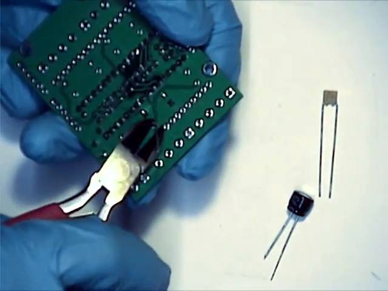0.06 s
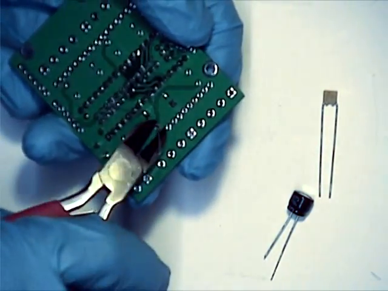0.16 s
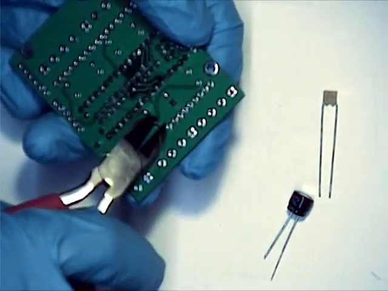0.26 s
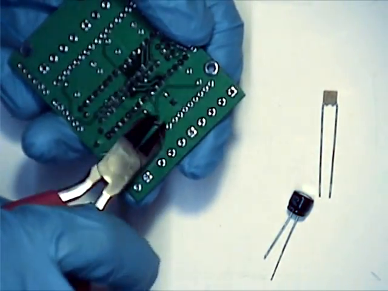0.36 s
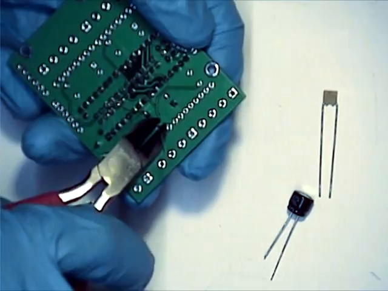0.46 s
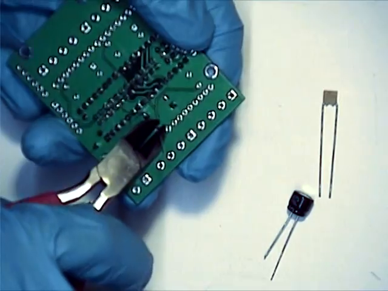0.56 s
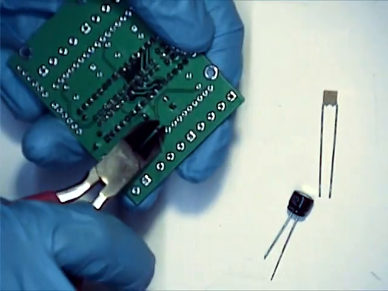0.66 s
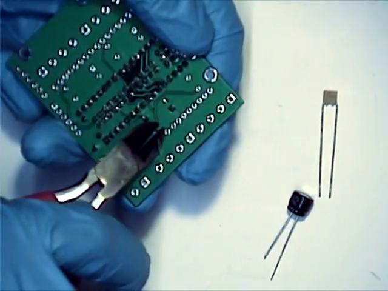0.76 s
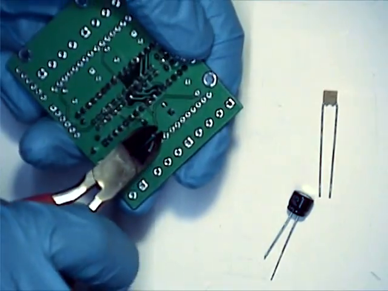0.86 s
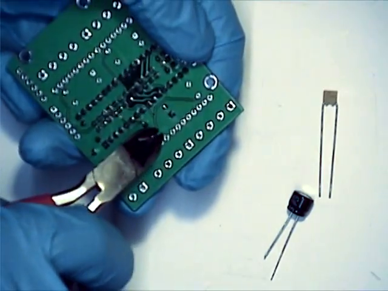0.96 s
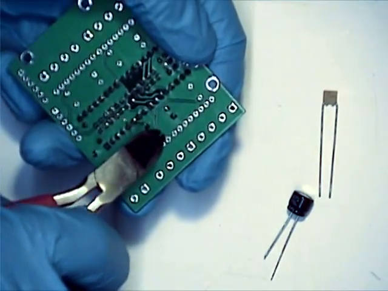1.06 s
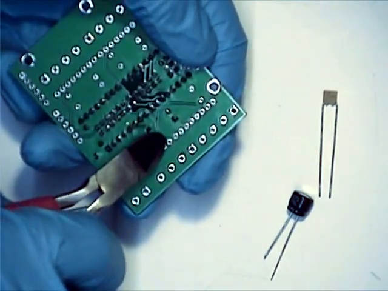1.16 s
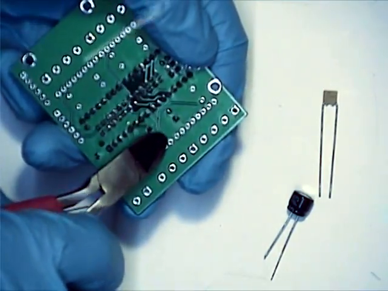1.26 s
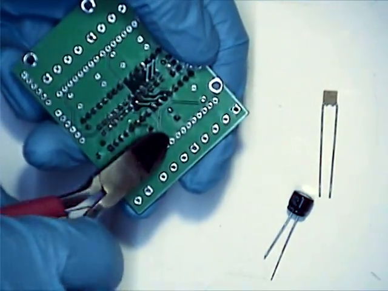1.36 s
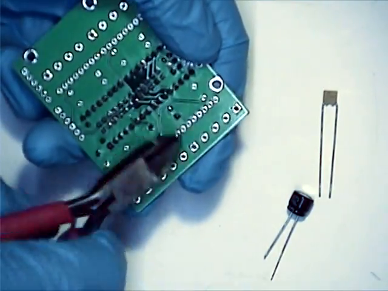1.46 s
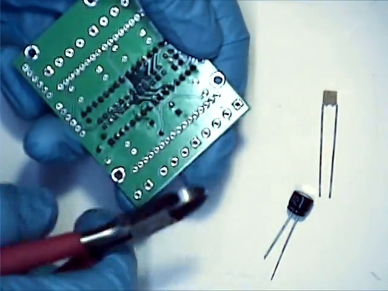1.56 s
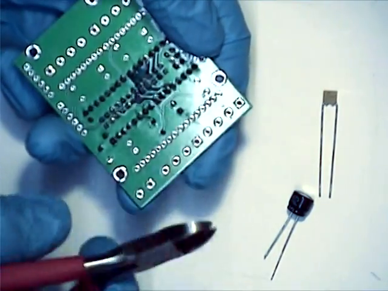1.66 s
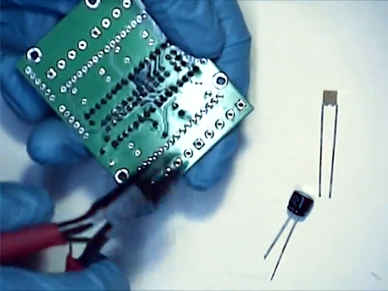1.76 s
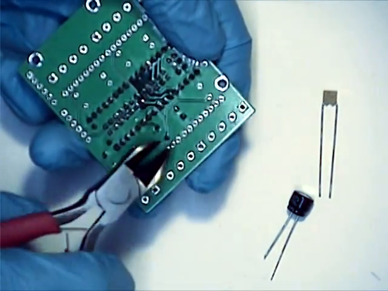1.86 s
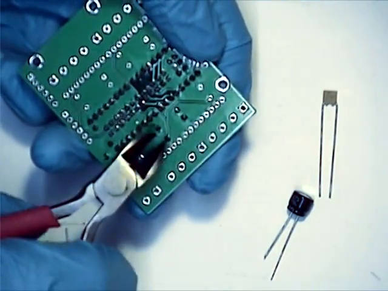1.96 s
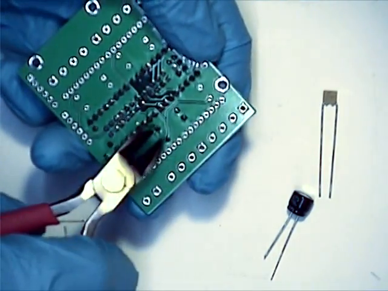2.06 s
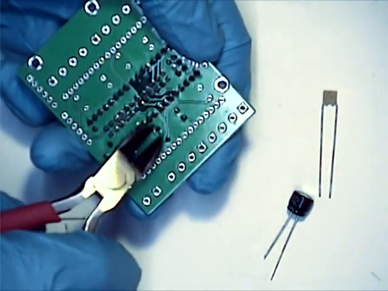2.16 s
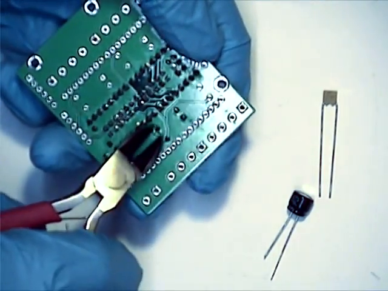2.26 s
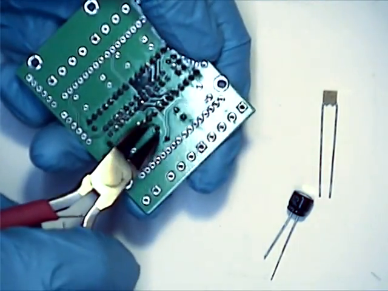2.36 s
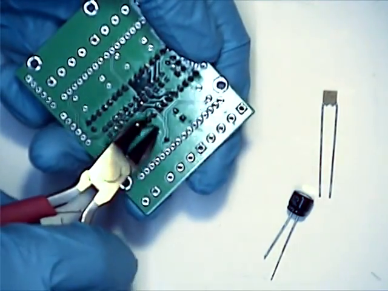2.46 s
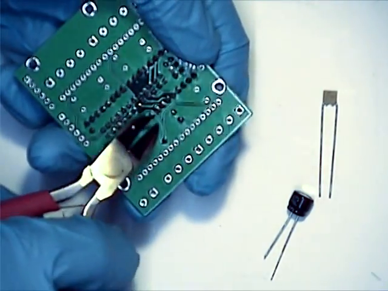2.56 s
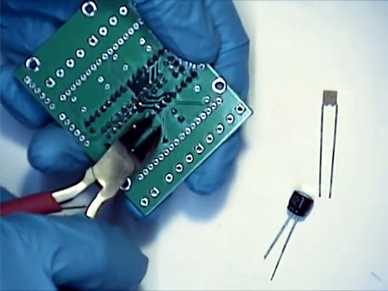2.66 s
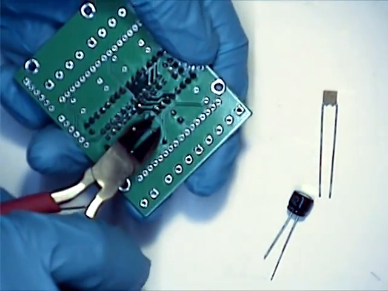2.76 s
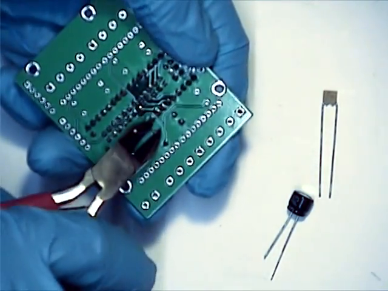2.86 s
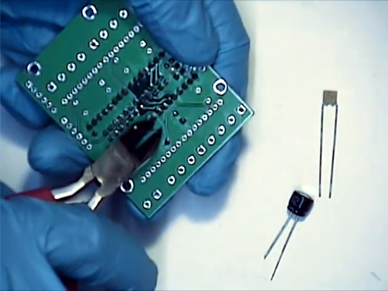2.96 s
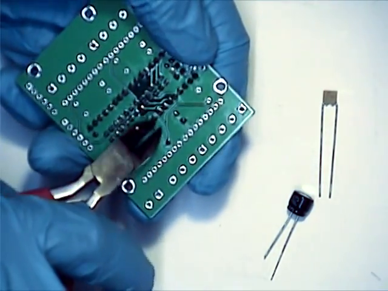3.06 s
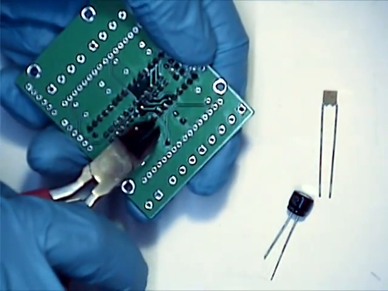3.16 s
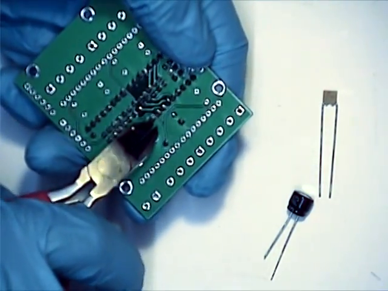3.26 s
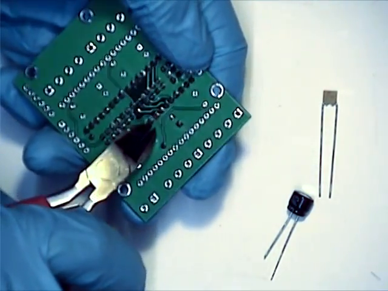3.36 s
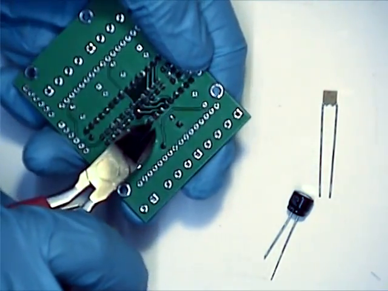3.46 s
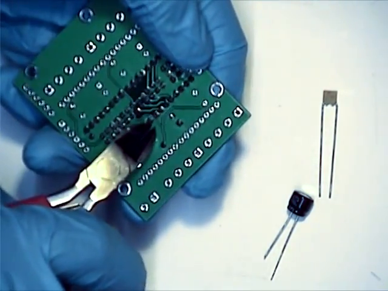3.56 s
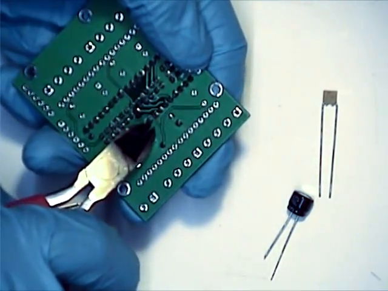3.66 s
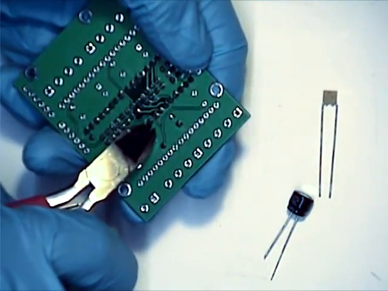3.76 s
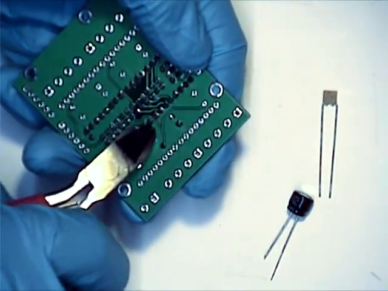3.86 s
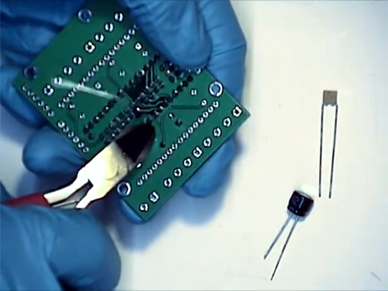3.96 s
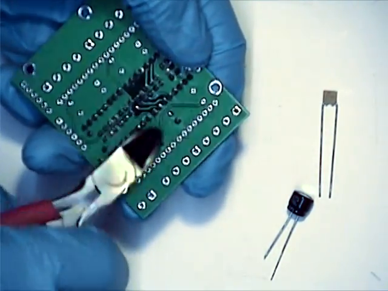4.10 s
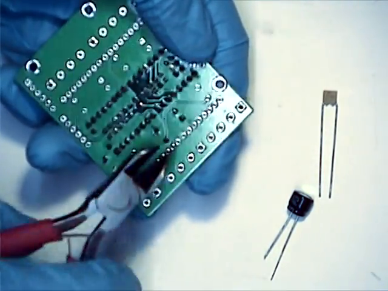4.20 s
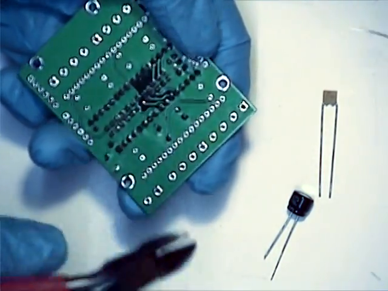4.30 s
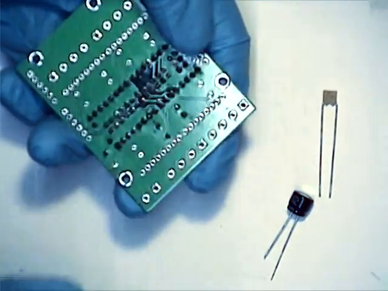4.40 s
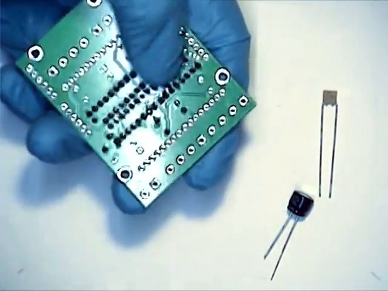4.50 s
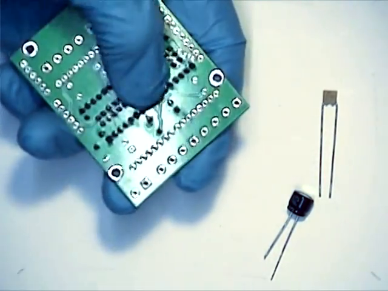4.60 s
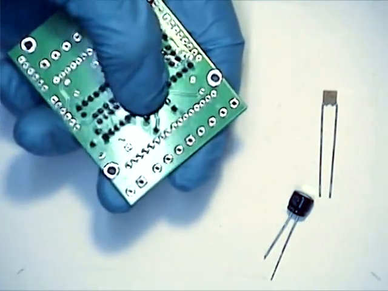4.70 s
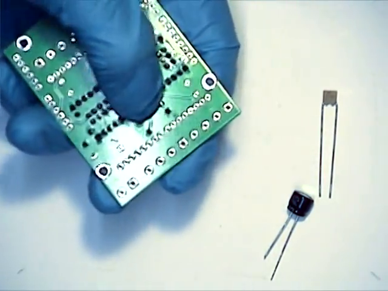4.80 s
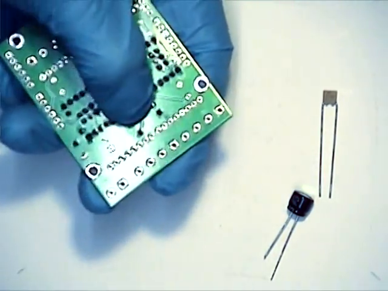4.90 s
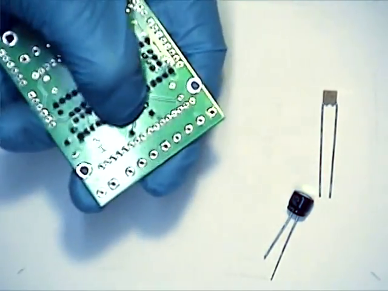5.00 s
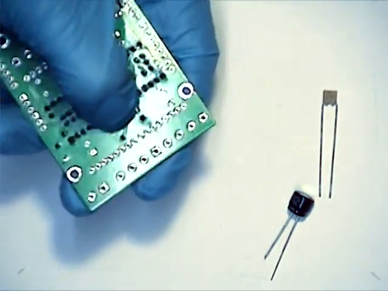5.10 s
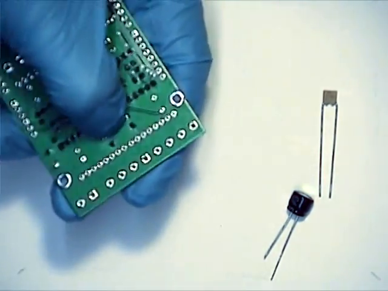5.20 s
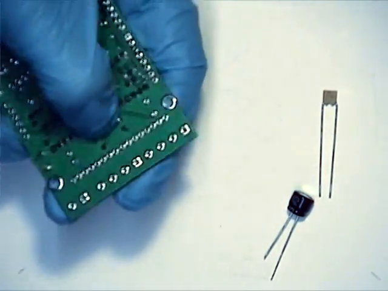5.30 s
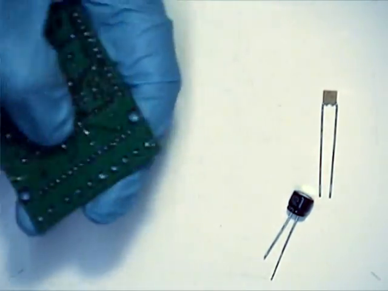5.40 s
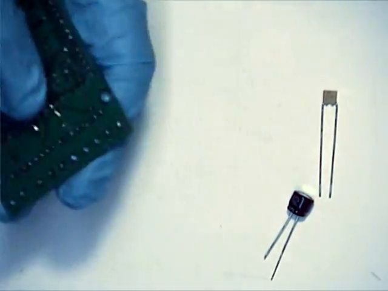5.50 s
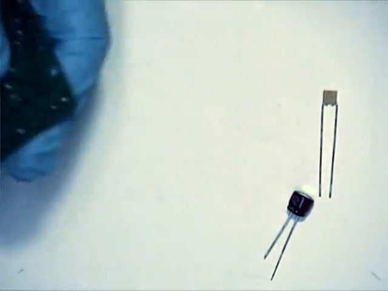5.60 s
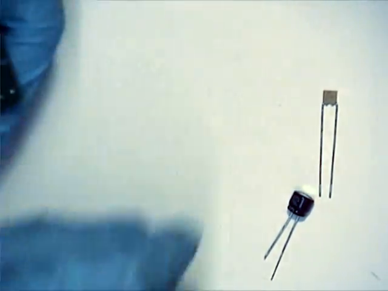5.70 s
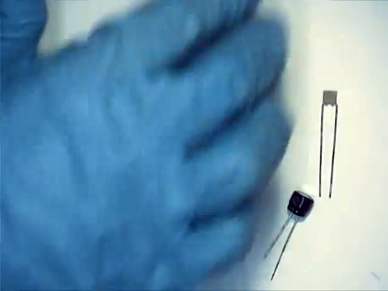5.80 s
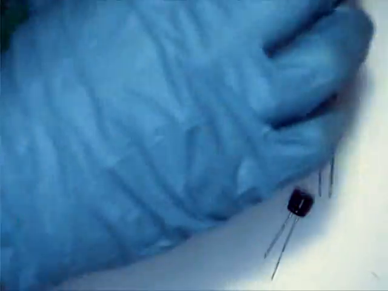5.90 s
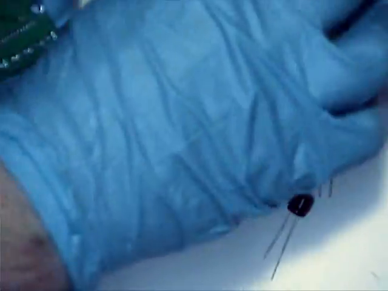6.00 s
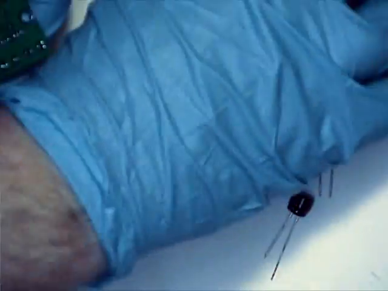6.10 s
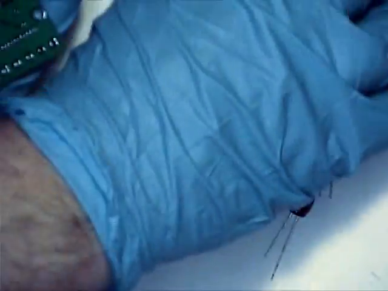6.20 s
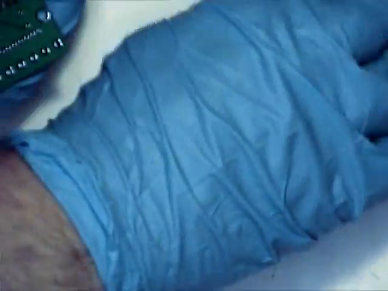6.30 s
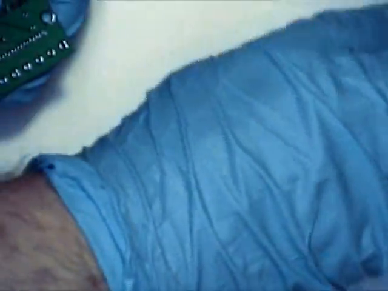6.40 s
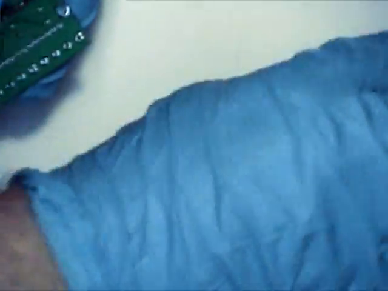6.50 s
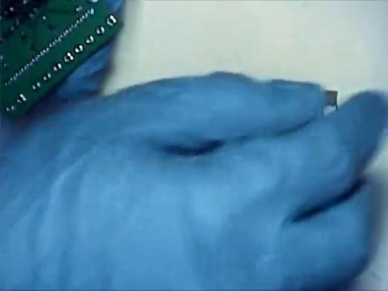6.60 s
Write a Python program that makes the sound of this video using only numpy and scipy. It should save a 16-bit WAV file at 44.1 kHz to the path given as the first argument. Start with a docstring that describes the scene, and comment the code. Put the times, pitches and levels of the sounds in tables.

```python
"""Close at a workbench, a microphone pair hears a continuous background: summed tones of a mains buzz
and a thin whine, and steady noise as hiss.
Side cutters crack through a wire, clack and rebound; then gloves, rubbed as tiny slips, shift the ticking board.
The hands move, the buzz changes colour, and a second, louder snip is followed by more clacks.
The board scrapes, ticks and bumps the ringing bench; last, a glove sweeps past the microphones.
A small, dry room answers the handwork with decaying noise echoes."""
import sys
import numpy as np
from scipy import signal
from scipy.fft import rfft, irfft
from scipy.io import wavfile

SR = 44100
rng = np.random.default_rng(int(sys.argv[2]) if len(sys.argv) > 2 else 0)


def persist_wave(psi):
    """Save psi, clipped to +-1, as 16-bit WAV."""
    counts = np.round(np.clip(psi, -1, 1) * 32767).astype(np.int16)
    wavfile.write(sys.argv[1], SR, np.atleast_2d(counts).T)


N = 293258
TIME = np.arange(N) / SR


def amp(db):
    """Decibels to gain."""
    return 10 ** (np.asarray(db) / 20)


def evened(x):
    """Scales to an rms of one."""
    return x / np.sqrt(np.mean(x ** 2) + 1e-20)


def read(points, hz, axis=1):
    """Joins one column of the points by straight lines on a log-frequency axis."""
    columns = np.transpose(points)
    return np.interp(np.log(hz + 1), np.log(columns[0] + 1), columns[axis])


def octaves(hz):
    """Octaves above 5 kHz, the hinge of every tilt; held constant below 400 Hz."""
    return np.log2(np.maximum(hz, 400) / 5000)


def add(mix, s, sound):
    """Mixes a sound in at a time in seconds."""
    part = mix[round(s * SR):][:len(sound)]
    part += sound[:len(part)]


def ring(modes):
    """Damped tones struck together, each losing 60 dB in its t60."""
    t = TIME[:SR // 3]
    return sum(amp(db - 60 * t / t60) * np.cos(2 * np.pi * hz * t) for hz, db, t60 in modes)


def crack(colour, tilt_db=0, ring_hz=1, ring_db=0, ring_octaves=0.12, spread=0.000908, size=4096):
    """A causal click of unit energy; bending waves carry its treble ahead of its bass."""
    hz = np.fft.rfftfreq(size, 1 / SR)
    bump = np.exp(-(np.log2((hz + 1) / ring_hz) / ring_octaves) ** 2)
    gain = amp(read(colour, hz) + tilt_db * octaves(hz) + ring_db * bump)
    # the minimum phase that belongs to this gain
    log_gain = np.log(np.r_[gain, gain[-2:0:-1]])
    phase = -signal.hilbert(log_gain).imag[:len(hz)]
    # spread in seconds scales the delay, which grows towards the bass
    delay = spread * (2 ** (-octaves(hz) / 2) - .5)
    phase = phase - 2 * np.pi * np.cumsum(delay) * SR / size
    click = irfft(gain * np.exp(1j * phase))[:size // 2]
    return click / np.linalg.norm(click)


# spectrum of the steady hiss: [f/Hz, relative level/dB per Hz]
HISS_COLOUR = [(20, -11.5), (60, -3.5), (120, 0.5), (220, -3.5), (450, 1), (1100, 4), (2000, 3), (3200, 5),
               (4100, 7), (5500, -0.5), (8000, -3.5), (12300, -4), (12800, -8), (13300, -53)]
# left-right likeness of the hiss: [f/Hz, correlation (no unit)]
HISS_LIKENESS = [(60, 0.64), (290, 0.2), (700, 0.68), (1500, 0), (3100, 0), (7000, 0), (15000, 0.14)]


def hiss(level_db=-62.5):
    """Room air in the bass, partly shared by both microphones; their own hiss in the treble."""
    hz = np.fft.rfftfreq(N, 1 / SR)
    left, other = rfft(rng.standard_normal((2, N)))
    same = np.clip(read(HISS_LIKENESS, hz), -1, 1)
    right = same * left + np.sqrt(1 - same ** 2) * other
    pair = np.array([left, right])
    return amp(level_db) * evened(irfft(pair * amp(read(HISS_COLOUR, hz)), N))


# thin electronic whine: [f/Hz, rms level/dB]
WHINE_TONES = [(6001, -79), (7500, -85), (9001, -85), (10500, -85), (12000, -85)]


def whine():
    """Steady electronic tones, with unrelated phases at the two microphones."""
    tones = sum(amp(db) * np.cos(2 * np.pi * (hz * TIME + rng.random((2, 1)))) for hz, db in WHINE_TONES)
    return np.sqrt(2) * tones


# strong harmonics: [multiple of the mains, level before the hands shift/dB, level after/dB]
BUZZ_STRONG = [(6, -73, -73), (8, -75, -74), (10, -73, -73), (12, -66, -66), (14, -71, -70), (16, -66, -67),
               (18, -75, -74), (20, -73, -73), (23, -76, -78), (24, -74, -73), (26, -76, -75),
               (28, -78, -78), (30, -77, -78), (38, -74, -72), (39, -77, -82), (58, -77, -74),
               (61, -77, -75), (62, -65, -68), (63, -68, -73), (64, -70, -70), (65, -84, -70),
               (66, -63, -73), (67, -72, -62), (68, -73, -86), (69, -79, -75), (70, -80, -78),
               (71, -80, -78), (72, -76, -76), (74, -78, -76), (75, -72, -72), (76, -74, -66),
               (77, -62, -72), (78, -78, -75), (79, -76, -74), (82, -83, -78), (94, -78, -81)]
# weaker harmonics between them, before random unevenness: [f/Hz, level of each/dB]
BUZZ_WEAK = [(60, -101), (240, -98), (500, -92), (1080, -88), (1800, -88), (2500, -83), (3240, -84),
             (4200, -85), (5160, -88), (6400, -89), (8000, -100), (12000, -104)]
# when the hands shift: [start t/s, end t/s]
SHIFT_TIMES = (3.42, 3.77)
# how the paths to the microphones smear each pulse: [f/Hz, phase scatter/rad, delay/s]
PATH_SMEAR = [(60, .5, .001), (1100, .55, .001), (1600, 1.3, .0005), (2300, .6, 0), (3200, 1.6, 0),
              (3700, .5, 0), (4050, .5, 0), (4400, 1.6, 0), (12000, 2, 0)]


def buzz(count=200):
    """Pulses locked to the mains, summed from wavering harmonics; the hands shift the path of each."""
    mains_hz, crest_s, waver_db, lead_s = 60.03, .0156, .6, .00006
    order = np.arange(1, count)
    before = read(BUZZ_WEAK, order * mains_hz) + 2 * rng.standard_normal(len(order))
    after = before.copy()
    for k, before_db, after_db in BUZZ_STRONG:
        before[k - 1], after[k - 1] = before_db, after_db
    knots = np.linspace(0, TIME[-1], num=60)
    shift = np.interp(knots, SHIFT_TIMES, [0, 1])
    # turn is a rotating phasor, advanced by one harmonic at each step
    step = np.exp(2j * np.pi * mains_hz * (TIME - crest_s))
    turn = np.ones(N, complex)
    out = np.zeros((2, N))
    for hz, first, last in zip(order * mains_hz, before, after):
        turn *= step
        # short waves waver more, most after the hands shift, and differ more between the microphones
        high = min(hz / 4000, 1)
        waver = waver_db * high * (1 + 2 * shift) * rng.standard_normal(len(knots))
        level = amp(first + (last - first) * shift + waver)
        # the bass reaches the left microphone first
        delay = read(PATH_SMEAR, hz, axis=2) - lead_s * (1 - high) * np.array([[1], [0]])
        scatter = read(PATH_SMEAR, hz) * rng.standard_normal()
        scatter = scatter + .5 * high * rng.standard_normal((2, 1))
        phase = scatter - 2 * np.pi * hz * delay
        wave = np.cos(phase) * turn.real - np.sin(phase) * turn.imag
        out += np.interp(TIME, knots, level) * wave
    return np.sqrt(2) * out * amp([[.5], [-.5]])


# late echoes of the small room: [f/Hz, t60/s, relative level/dB]
ROOM_ECHOES = [(100, 0.31, -7.5), (490, 0.23, -2), (1500, 0.17, 5), (2760, 0.18, 5), (7000, 0.18, -1.5),
               (11000, 0.14, 7), (14500, 0.13, 5.5)]


def room(x, near_db, tail_db, same, right_db, near_t60=0.029, lag=1.28):
    """Direct sound at two close microphones, quick echoes off bench and hands, then the walls."""
    t = TIME[:SR // 2]
    same = np.clip(same, 0, 1)
    noise = rng.standard_normal((2, 3, len(t)))
    # same is the share of echo power common to both microphones
    near, far = np.sqrt(same) * noise[:, :1] + np.sqrt(1 - same) * noise[:, 1:]
    near *= amp(-60 * t / near_t60) * (t > .0008)
    hz, age, z = signal.stft(far, SR, nperseg=256)
    decay_db = 60 * age / read(ROOM_ECHOES, hz)[:, None]
    z = z * amp(read(ROOM_ECHOES, hz, axis=2)[:, None] - decay_db)
    far = signal.istft(z, SR, nperseg=256)[1][:, :len(t)] * np.minimum(t / 0.0013, 1)
    echoes = amp(near_db) * near / np.linalg.norm(near[0])
    echoes += amp(tail_db) * far / np.linalg.norm(far[0])
    # the direct sound reaches the right microphone later, by lag in samples
    late = irfft(rfft(x) * np.exp(-2j * np.pi * np.fft.rfftfreq(N) * lag), N)
    pair = np.array([x, late]) + signal.oaconvolve(x[None], echoes, axes=1)[:, :N]
    # right_db is half the level difference between the microphones
    return pair * amp([[-right_db], [right_db]])


# strokes of the rubber gloves; rise and fall are the times for a 20 dB change:
# [peak t/s, rise/s, fall/s, level/dB, tilt/dB an octave]
GLOVE_STROKES = [(2.55, 0.049, 0.043, -54, 7), (2.638, 0.018, 0.015, -45.5, 0),
                 (4.17, 0.17, 0.76, -63.5, -2.5), (4.54, 0.2, 0.13, -52.5, -3.5),
                 (5.07, 0.15, 0.23, -59.5, -5), (5.155, 0.036, 0.49, -61, -7),
                 (5.44, 0.12, .12, -46.5, -4.5), (5.61, 0.072, 0.094, -59, -5),
                 (5.78, 0.14, .3, -58.5, -2.5), (5.89, 0.044, 0.064, -55, -3.5),
                 (6.05, 0.36, 0.27, -63, -6.5), (6.275, 0.097, 0.14, -49.5, -0.5),
                 (6.415, 0.16, 0.067, -44, 3), (6.463, 0.064, 0.094, -37.5, 2), (6.53, .06, .04, -48, -3.5)]


def strokes(t, range_db=20):
    """Strength and tilt: strokes rise and fall evenly in dB, the strongest dominating the brightness."""
    peak_s, rise_s, fall_s, db, tilt_db = np.transpose(GLOVE_STROKES)[:, :, None]
    away = np.maximum((peak_s - t) / rise_s, (t - peak_s) / fall_s)
    power = amp(db - range_db * away) ** 2 + 1e-20
    total = power.sum(0)
    return np.sqrt(total), (power * tilt_db).sum(0) / total


# spectrum of rubbed rubber before each stroke's tilt: [f/Hz, relative level/dB per Hz]
GLOVE_COLOUR = [(80, -31), (400, -20.5), (1400, -9.5), (2100, -10.5), (3000, -5), (4200, 0), (6000, -2),
                (7700, 0), (9500, -3.5), (11500, -1), (14000, -13.5), (15500, -33)]


def glove(slips_per_s=5000, size_db=3.0):
    """Tiny slips of rubber, of uneven size, under the strength and brightness of the stroke."""
    happens = rng.random(N) < slips_per_s / SR
    size = amp(size_db * np.minimum(rng.exponential(1, N), 4))
    slips = rng.standard_normal(N) * happens * size
    hz, t, z = signal.stft(evened(slips), SR, nperseg=256)
    strength, tilt_db = strokes(t)
    colour = amp(read(GLOVE_COLOUR, hz)[:, None] + octaves(hz)[:, None] * tilt_db)
    colour /= np.sqrt(np.mean(colour ** 2, axis=0))
    rubbed = signal.istft(z * colour, SR, nperseg=256)[1][:N]
    return rubbed * np.interp(TIME, t, strength)


# dull bumps of hand and board on the bench: [t/s, level/dB, favoured f/Hz]
BENCH_BUMPS = [(5.08, -30, 260), (5.159, -38.5, 400), (5.294, -33.5, 620), (5.4, -16, 400),
               (5.4085, 0, 626), (5.4104, -7.5, 1250), (5.4155, -5.5, 338), (5.424, -8, 700)]
# resonances of the bench top: [f/Hz, relative level/dB, t60/s]
BENCH_TOP = [(166, -39, 0.086), (256, -13, 0.15), (354, 4, 0.046), (444, -4, 0.048), (538, -5.5, 0.089),
             (615, 1.5, 0.049), (794, -15, 0.025), (1218, -7, 0.036)]


def bench(low_cut_hz=190, soft_hz=2200, focus_db=5):
    """Each bump, softened by the glove, rings the bench top, favouring a pitch that depends on the spot."""
    out = np.zeros(N)
    contact = signal.butter(2, [low_cut_hz, soft_hz], "bandpass", fs=SR, output="sos")
    for s, db, favoured_hz in BENCH_BUMPS:
        # modes lose focus_db for each octave away from the favoured pitch
        modes = [(hz, mode_db - focus_db * abs(np.log2(hz / favoured_hz)), t60)
                 for hz, mode_db, t60 in BENCH_TOP]
        thud = signal.sosfilt(contact, ring(modes))
        add(out, s, amp(db) * thud / np.linalg.norm(thud))
    return out


# ticks as the fingers shift their grip: [t/s, level/dB, tilt/dB an octave, strongest ring f/Hz]
BOARD_TICKS = [(2.366, -33, 13, 11900), (2.633, -27.5, 1, 2450), (2.703, -30.5, 1.5, 2450),
               (4.911, -30.5, 4, 3350), (5.0655, -16, -1.5, 2700), (5.1567, -30, -1, 1440),
               (5.2862, -9.5, 4, 4550), (5.393, -14, -2, 3400), (5.418, -10.5, 4, 3120),
               (5.4262, -8.5, 5, 4160), (5.471, -18, -0.5, 3500), (5.534, -27.5, 2.5, 3800),
               (6.4437, -10.5, 10, 8400)]
# spectrum of a tick before tilt and ring: [f/Hz, relative level/dB per Hz]
TICK_COLOUR = [(60, -24), (170, -37), (300, -2), (700, -6), (1400, 5), (1900, 6), (2500, 3.5), (3600, 5),
               (4800, 5), (6000, 5), (8500, -3), (12000, -10), (15000, -30)]
# scrapes against jaws and bench: [start t/s, length/s, level/dB, tilt/dB an octave]
BOARD_SCRAPES = [(2.529, 0.056, -53, 1.5), (2.63, 0.022, -53, -0.5), (4.525, 0.054, -49.5, 5),
                 (5.028, .036, -55.5, -2.5), (5.397, 0.039, -41, 1)]


def board(ring_db=8, scrape_ring_db=6, scrape_ring_hz=2320, scrape_ticks_per_s=700, scrape_spread_db=1):
    """Dry board ticks, damped by the fingers, alone or in runs; each contact favours one resonance."""
    out = np.zeros(N)
    for s, db, tilt_db, hz in BOARD_TICKS:
        tick = crack(TICK_COLOUR, tilt_db=tilt_db, ring_hz=hz, ring_db=ring_db,
                     ring_octaves=0.38, spread=0.001216)
        add(out, s, amp(db) * tick)
    happens = rng.random(N) < scrape_ticks_per_s / SR
    catches = happens * rng.choice([-1, 1], N) * amp(scrape_spread_db * rng.standard_normal(N))
    for s, length, db, tilt_db in BOARD_SCRAPES:
        run = evened(catches[round(s * SR):round((s + length) * SR)])
        tick = crack(TICK_COLOUR, tilt_db=tilt_db, ring_hz=scrape_ring_hz, ring_db=scrape_ring_db)
        add(out, s, amp(db) * signal.fftconvolve(run, tick))
    return out


# the jaws bite through a wire: [t/s, level/dB, level of the push on the hand/dB]
WIRE_SNIPS = [(1.2371, 7, -32), (3.958, 11, -16)]
# spectrum of a snip: [f/Hz, relative level/dB per Hz]
WIRE_COLOUR = [(60, -48), (500, -23.5), (1250, -11), (1800, -15.5), (2450, -1.5), (3000, -0.5), (3400, -3),
               (3850, 1), (5000, -4), (6500, -3.5), (7800, 2.5), (9400, -6), (10800, -2.5), (15000, -12.5)]
# steel jaws clack and catch on the board: [t/s, level/dB, strongest ring f/Hz]
JAW_CLACKS = [(1.5965, 3, 7900), (1.6, 5.5, 4450), (1.7181, -4.5, 4840), (1.7495, -3, 8060),
              (1.7569, -4.5, 4540), (1.7756, -12.5, 8000), (1.8040, -9.5, 8550), (2.4845, -22.5, 5840),
              (2.5750, -20, 8400), (2.5776, -14.5, 5900), (4.3930, 6, 8400), (4.3973, 6, 5610),
              (4.4824, -4.5, 8160), (4.6199, -13, 8550)]
# spectrum of a clack before its ring: [f/Hz, relative level/dB per Hz]
JAW_COLOUR = [(60, -47), (500, -20.5), (1100, -16), (1900, -15.5), (3000, -7.5), (4200, -0.5), (5600, -3),
              (7000, -0.5), (8600, -4), (10500, -7.5), (12500, -8.5), (15000, -18)]
# lingering rings of the steel tool: [f/Hz, level/dB, t60/s]
TOOL_RINGS = [(2975, -53, .14), (4090, -54, .14), (5420, -60, .12), (6003, -56, .16), (7501, -49, .17),
              (9002, -53, .16), (10501, -51, .17), (12001, -52, .17)]


def cutters(clack_ring_db=10, count=3):
    """Wires part with a crack and a soft push; the jaws clack and rebound; the steel rings on."""
    rebound_gap_s, rebound_db, rebound_loss_db, push_s = .004, -10.5, 4, .0014
    out = np.zeros(N)
    u = TIME[:SR // 20] / push_s
    push = (1 - u / 2) * np.exp(-u)
    for s, db, push_db in WIRE_SNIPS:
        add(out, s, amp(db) * crack(WIRE_COLOUR, spread=0.0019))
        add(out, s, amp(push_db) * push / np.linalg.norm(push))
    # rebounds follow each clack at uneven gaps, each weaker than the last
    rebound = crack(JAW_COLOUR, spread=0.000466)
    gaps = rebound_gap_s * (.5 + rng.random((len(JAW_CLACKS), count)))
    for (s, db, hz), delays in zip(JAW_CLACKS, np.cumsum(gaps, axis=1)):
        clack = crack(JAW_COLOUR, ring_hz=hz, ring_db=clack_ring_db, spread=0.000741)
        add(out, s, amp(db) * clack)
        for k, delay in enumerate(delays):
            add(out, s + delay, amp(db + rebound_db - k * rebound_loss_db) * rebound)
    return out + signal.oaconvolve(out, ring(TOOL_RINGS))[:N]


def scene():
    """The work of the hands, close to the microphones, over the continuous buzz, whine and hiss."""
    background = hiss() + whine() + buzz()
    rustle = room(glove(), near_db=0.5, tail_db=-7.5, same=0.5, right_db=0.8)
    bumps = room(bench(), near_db=-3.5, tail_db=-3, same=1.0, right_db=0.0)
    ticks = room(board(), near_db=-1.5, tail_db=-2.5, same=0.53, right_db=1.4)
    tool = room(cutters(), near_db=-3.5, tail_db=-4.5, same=0.21, right_db=0.5)
    return background + rustle + bumps + ticks + tool


def record(dry):
    """Rounds off only the peaks beyond the knee; then a steep low-pass limits the band."""
    knee, headroom, edge_hz = .65, .25, 15300
    within = np.clip(dry, -knee, knee)
    rounded = within + headroom * np.tanh((dry - within) / headroom)
    low_pass = signal.firwin(255, edge_hz, window=("kaiser", 8), fs=SR)
    return signal.oaconvolve(rounded, low_pass[None], "same")


dry = scene()
out = record(dry)
persist_wave(out)
```